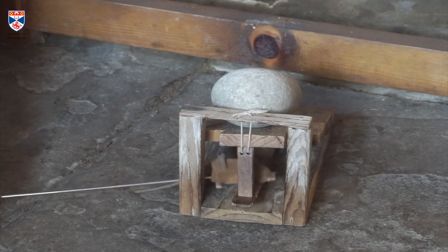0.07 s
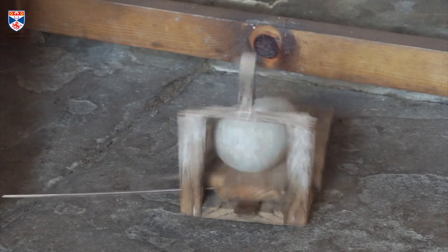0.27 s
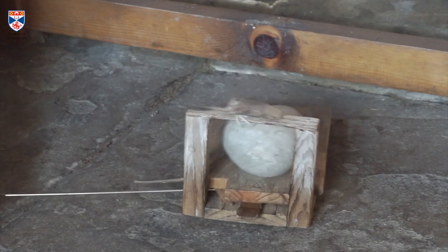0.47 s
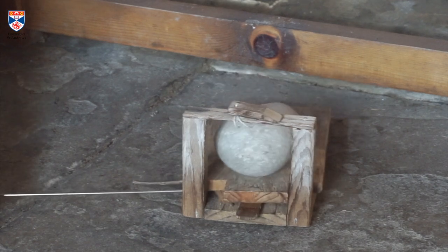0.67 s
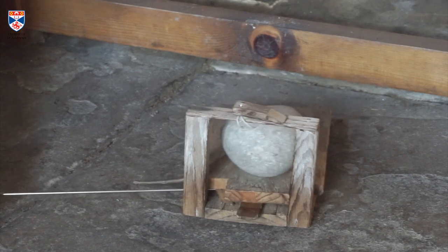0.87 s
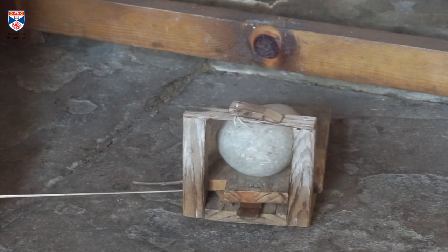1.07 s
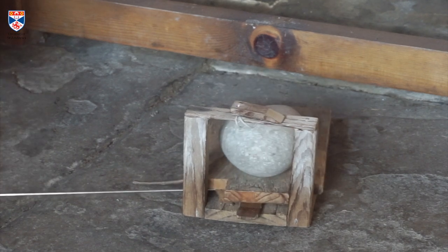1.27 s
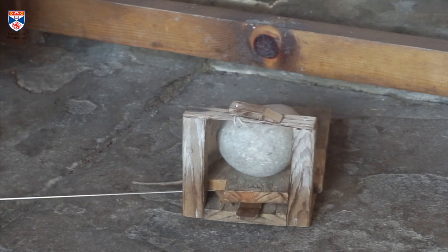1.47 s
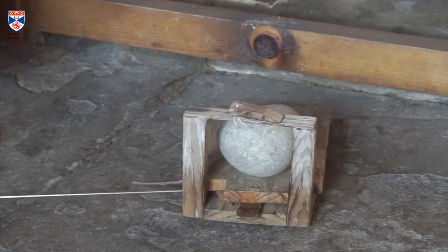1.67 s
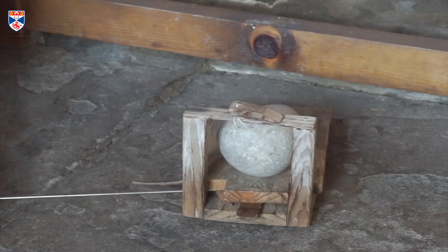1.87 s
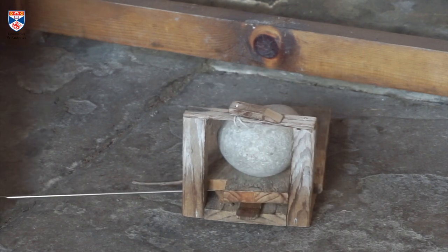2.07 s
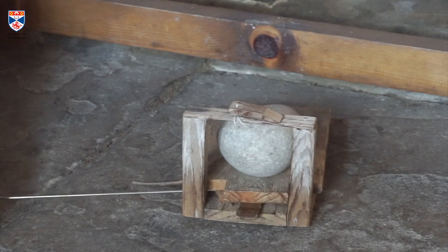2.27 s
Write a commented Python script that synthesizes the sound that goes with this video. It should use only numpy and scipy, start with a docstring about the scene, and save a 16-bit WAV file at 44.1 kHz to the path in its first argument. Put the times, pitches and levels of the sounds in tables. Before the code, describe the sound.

A small wooden trap snaps shut with one sharp knock and a brief rattle indoors.

```python
"""A stone-weighted wooden block slams onto the base of a small deadfall trap, bounces and rattles to rest.
Just before that, the trigger slips and the freed lever slaps the frame; the trigger stick drops last.
Each hit is a short crack of noise plus the ringing tones of the wood. The trap stands on a stone floor
indoors, and the room echoes. Then come faint clicks and dull, distant knocks, over hiss and a low hum."""
import sys
import numpy as np
from scipy import signal
from scipy.fft import rfft, irfft, next_fast_len
from scipy.io import wavfile
from scipy.ndimage import uniform_filter1d, minimum_filter1d

SR = 44100
rng = np.random.default_rng(int(sys.argv[2]) if len(sys.argv) > 2 else 0)


def unload_audio(sound):
    """Save the sound as a 16-bit wav file, at the path given as the first command line argument."""
    columns = np.transpose(np.atleast_2d(sound))
    # keep every value between -1 and 1, then stretch to whole-number steps
    steps = np.round(np.clip(columns, -1, 1) * 32767)
    wavfile.write(sys.argv[1], SR, steps.astype(np.int16))


N = 102135
T = np.arange(SR * 3 // 4) / SR  # the clock for one hit or echo [s]

# each landing of the block (time [s], level [dB], brightness [dB per octave], ring over crack [dB])
BLOCK_HITS = [(.3438, -4, -3.5, -1), (.3501, -9.5, -2, -2.5), (.3541, -14.5, 4, 2.5), (.3596, -19.5, 0, 5),
              (.3746, -12, 0, -9), (.3817, -13, -1, 2), (.3856, -19, -2.5, -15), (.3919, -20.5, 2, -2),
              (.4053, -19.5, -0.5, -8), (.4195, -17, -2, -0.5), (.4250, -13.5, -4, 0), (.4360, -21, 1.5, 6),
              (.4510, -19.5, -2.5, -20.5), (.4628, -22, -5, -8.5), (.491, -27.5, -3.5, 2.5),
              (.506, -37.5, -9.5, 2), (.634, -45.5, -2.5, 5)]
# the tones that block and base ring with (pitch [Hz], level [dB], time to fade by 60 dB [s])
BLOCK_TONES = [(512, -16.5, .09), (680.2, -11.5, 0.037), (808, -12, 0.054), (874, -17, 0.12),
               (918.5, -8, 0.05), (1028, -15.5, 0.09), (1187, -7, 0.089), (1256.3, -11, 0.14),
               (1296, -10.5, 0.082), (1367.5, -7.5, 0.076), (1592, -19.5, 0.068), (1835, -17, .09),
               (2500, -23, .08), (2837, -19, .07), (4930, -39, .07)]
# the crack of each landing, from bass to treble (frequency [Hz], level [dB])
BLOCK_CRACK = [(80, -31), (400, -20), (650, -4.5), (1000, 1.5), (1200, 5), (1360, 10.5), (1470, -7),
               (1700, 2), (2150, -9), (2900, -5.5), (4300, -18.5), (6500, -25.5), (8500, -39.5),
               (11000, -62)]
# the low thud that swells as the block drops (frequency [Hz], level [dB])
BLOCK_THUD = [(40, -16.5), (90, 0), (170, -0.5), (270, -6), (480, -7.5), (900, -24.5), (3000, -50)]


def falling_block():
    """A low thud swells as the weighted block drops, just before it strikes the base and rattles."""
    out = struck(BLOCK_HITS, BLOCK_TONES, BLOCK_CRACK,
                 crack_db=0, crack_fade_s=0.054, echo_db=-8, low_cut_hz=327)
    thud = puff(lambda hz: read_curve(BLOCK_THUD, hz), rise_s=0.016, fade_s=0.19)
    add(out, amp(-32) * thud, start_s=0.323)
    return out


# each slap of the lever (time [s], level [dB], brightness [dB per octave], ring over crack [dB])
LEVER_HITS = [(.2538, -12.5, 1, -2), (.2573, -16, -2.5, -1), (.273, -26, 1, -4), (.310, -30, 1, -4.5),
              (.329, -29.5, -5, -2)]
# the tones the lever rings with (pitch [Hz], level [dB], time to fade by 60 dB [s])
LEVER_TONES = [(764, -14.5, 0.12), (841.7, -8, .04), (1248, -10.5, .2), (1600, -12, 0.019), (1710, 2, .03),
               (2236, -14, .05), (2380, -10, .06), (2964, -18, 0.039), (3522, -18.5, .04)]
# the crack of lever on frame (frequency [Hz], level [dB])
LEVER_CRACK = [(120, -46), (400, -9), (850, 3.5), (1270, 10), (1480, 0.5), (1750, 5), (3200, -0.5),
               (5500, -13.5), (8000, -25), (11000, -35.5)]


def lever():
    """The freed lever whips round and clatters on the frame."""
    return struck(LEVER_HITS, LEVER_TONES, LEVER_CRACK,
                  crack_db=0.5, crack_fade_s=0.055, echo_db=-2, low_cut_hz=334)


# each tap of the stick (time [s], level [dB], brightness [dB per octave], ring over crack [dB])
STICK_HITS = [(.5525, -33, 1, -1), (.627, -47.5, 4, -9)]
# the tones the stick rings with (pitch [Hz], level [dB], time to fade by 60 dB [s])
STICK_TONES = [(2540, -3, 0.058), (2696, -7, .05), (3405, -9, .02), (4830, -18, .03)]
# the crack of each tap (frequency [Hz], level [dB])
STICK_CRACK = [(300, -14), (1400, 8.5), (3300, 8), (5500, -12.5), (10000, -18.5)]


def trigger_stick():
    """The light, loose trigger stick drops and hops once."""
    return struck(STICK_HITS, STICK_TONES, STICK_CRACK,
                  crack_db=0.5, crack_fade_s=0.037, echo_db=-4, low_cut_hz=700)


# faint clicks and scuffs of trigger, stone, cord and wood, a first faint distant knock at the very start, plus
# one loud, sharp crack as the block lands # (time [s], level [dB], centre pitch [Hz], width [octaves], rise
# time [s], time to fade by 60 dB [s])
CLICKS = [(.001, -45, 906, 0.65, 0.00088, 0.21), (0.1592, -41, 2250, 0.74, 0.00098, 0.043),
          (0.236, -33.5, 1860, 1.3, 0.0041, 0.054), (0.3496, -5, 3000, 0.31, .0003, 0.013),
          (0.411, -24, 4600, .7, 0.00058, 0.0069), (.960, -44.5, 1190, 0.83, 0.0024, 0.071),
          (1.498, -28, 6800, 0.54, 0.012, 0.066), (1.511, -50, 1696, 0.78, 0.0034, 0.16),
          (1.676, -49.5, 7630, 0.13, 0.00039, 0.039), (1.731, -49, 880, 1.42, 0.005, 0.12),
          (1.763, -46, 3500, 1.2, 0.00059, 0.027), (2.295, -53, 2500, 0.85, 0.0025, 0.15)]


def clicks():
    """Faint clicks, scuffs, a first distant knock and one loud landing crack are each a puff of noise around
    their own pitch."""
    out = np.zeros((2, N))
    for start_s, level_db, centre_hz, width, rise_s, fade_s in CLICKS:
        def hump_db(hz):
            distance = np.log2((hz + 1) / centre_hz) / width
            return -20 * np.log10(1 + distance ** 2 / 2 + (distance / 2) ** 4)
        click = puff(hump_db, rise_s, fade_s)
        add(out, amp(level_db) * room_echo(click, echo_db=-6), start_s)
    return out


# each dull knock (time [s], level [dB], brightness [dB per octave], ring over crack [dB])
KNOCK_HITS = [(1.0598, -43.5, -1, -0.5), (1.0661, -43.5, -1.5, -0.5), (1.578, -42, 0.5, -5.5),
              (1.586, -40.5, 1, -10), (2.1541, -46.5, .5, -1.5), (2.1621, -41.5, .5, -2)]
# the tones the knocks ring with (pitch [Hz], level [dB], time to fade by 60 dB [s])
KNOCK_TONES = [(494, -11.5, 0.061), (587, -2, 0.071), (626, -1, 0.075), (851, -10.5, 0.054),
               (1116, -28, 0.045), (1910, -13.5, 0.028), (2170, -11, .04)]
# the soft noise of each contact (frequency [Hz], level [dB])
KNOCK_PUFF = [(150, -15), (350, -12.5), (550, 3), (900, 2.5), (1250, -5.5), (1700, -10.5), (2500, -15),
              (4000, -22.5), (10000, -67.5)]


def distant_knocks():
    """Soft, hollow knocks come from across the room."""
    return struck(KNOCK_HITS, KNOCK_TONES, KNOCK_PUFF,
                  crack_db=-0.5, crack_fade_s=0.065, echo_db=-0.5, low_cut_hz=140)


def struck(hits, tones, crack_curve, crack_db, crack_fade_s, echo_db, low_cut_hz):
    """Each hit cracks and rings with its own loudness, brightness and amount of ring."""
    rise_s, scatter_db = 0.00044, 5
    out = np.zeros((2, N))
    for start_s, level_db, brightness, ring_db in hits:
        def tilt_db(hz):
            return brightness * np.log2(np.clip(hz, 300, 5000) / 1200)
        ring = np.zeros(len(T))
        for k, (pitch_hz, tone_db, fade_s) in enumerate(tones):
            gain = amp(tone_db + tilt_db(pitch_hz) + scatter_db * rng.standard_normal())
            wave = (-1) ** k * np.sin(2 * np.pi * pitch_hz * T)  # every other tone starts downward
            ring += gain * wave * rise_and_fade(rise_s, fade_s)
        crack = puff(lambda hz: read_curve(crack_curve, hz) + tilt_db(hz), rise_s, crack_fade_s)
        hit = amp(ring_db) * ring + amp(crack_db) * crack
        add(out, amp(level_db) * room_echo(hit, echo_db), start_s)
    # a small object gives off little bass
    return signal.sosfilt(signal.butter(2, low_cut_hz, "highpass", fs=SR, output="sos"), out)


# how alike a puff is in the left and right ear (frequency [Hz], likeness [-1 to 1])
PUFF_LIKENESS = [(1200, 0.97), (2500, 1), (5000, 0.66), (9000, .45)]


def puff(colour_db, rise_s, fade_s):
    """A puff of noise rises and dies away; colour_db gives the level at each frequency."""
    noise = stereo(rng.standard_normal((2, len(T))), PUFF_LIKENESS)
    coloured = filtered(noise, lambda hz: amp(colour_db(hz)))
    return normalise(coloured) * rise_and_fade(rise_s, fade_s)


# how long the room's echo lasts (frequency [Hz], time to fade by 60 dB [s])
ECHO_FADE = [(150, 0.97), (600, 0.37), (1300, 0.33), (3000, 0.33), (6000, 0.45), (11000, 0.17)]
# how alike the echo is in the left and right ear (frequency [Hz], likeness [-1 to 1])
ECHO_LIKENESS = [(150, .8), (500, 0.98), (1300, 0.98), (2500, 0.63), (5000, 1), (9000, .15)]
# how strongly the room returns each frequency (frequency [Hz], level [dB])
ECHO_COLOUR = [(200, 2.5), (800, -4.5), (1270, 1.5), (1500, 3), (1730, -6.5), (2100, 1), (3000, -1.5),
               (9000, -0.5)]


def room_echo(sound, echo_db):
    """The room adds a tail of echoes in which each frequency dies away at its own speed."""
    build_up_s = 0.0036
    hz, t, bands = signal.stft(rng.standard_normal((2, len(T))), SR, nperseg=256)
    fading = np.exp(-np.log(1000) * t / read_curve(ECHO_FADE, hz)[:, None])
    tail = signal.istft(bands * fading, SR)[1][:, :len(T)]
    tail = stereo(tail * (1 - np.exp(-T / build_up_s)), ECHO_LIKENESS)
    tail /= np.linalg.norm(tail[0])
    tail = filtered(tail, lambda hz: amp(read_curve(ECHO_COLOUR, hz)))
    return sound + amp(echo_db) * signal.fftconvolve(sound, tail, axes=1)[:, :len(T)]


# the hiss, from bass to treble (frequency [Hz], level [dB])
HISS_COLOUR = [(12, -29), (20, -7.5), (38, -14.5), (62, -13.5), (77, -21), (161, -23.5), (288, -25),
               (652, -23.5), (725, -26), (1690, -28), (2440, -29.5), (11000, -34), (14300, -71),
               (22000, -120)]
# how alike the hiss is in the left and right ear (frequency [Hz], likeness [-1 to 1])
HISS_LIKENESS = [(60, 0.51), (170, 0.54), (490, 0.42), (1410, 0.18), (4040, 0.14), (11600, 0.074)]
# the slow drift in the loudness of the hiss (time [s], level [dB])
HISS_LEVEL = [(0, -55.5), (.85, -58), (1.0, -57.5), (1.2, -55.5), (1.45, -56), (2.1, -56), (2.3, -53.5)]
# four low hum tones and one high whine (pitch [Hz], level [dB])
HUM_TONES = [(25, -56.5), (50, -63), (75, -73.5), (100, -71.5), (9152, -80.5)]


def background():
    """A soft hiss runs under everything, with a low hum and a faint whine."""
    t = np.arange(N) / SR
    noise = stereo(rng.standard_normal((2, N)), HISS_LIKENESS)
    hiss = normalise(filtered(noise, lambda hz: amp(read_curve(HISS_COLOUR, hz))))
    hiss_gain = amp(np.interp(t, *np.transpose(HISS_LEVEL)))
    hum = sum(np.sqrt(2) * amp(db) * np.sin(2 * np.pi * (hz * t + rng.random())) for hz, db in HUM_TONES)
    return hiss_gain * hiss + hum


def amp(db):
    """Turn decibels into a number to multiply a sound by."""
    return 10 ** (np.asarray(db) / 20)


def normalise(sound):
    """Scale a sound so that its average strength (rms) is 1."""
    return sound / np.sqrt(np.mean(sound ** 2) + 1e-20)


def read_curve(points, hz):
    """Read between the rows of a (frequency [Hz], value) table, with octaves evenly spaced."""
    frequencies, values = np.transpose(points)
    return np.interp(np.log(hz + 1), np.log(frequencies + 1), values)


def filtered(sound, gain_at):
    """Turn each frequency up or down by gain_at(hz)."""
    length = sound.shape[-1]
    padded = next_fast_len(length + 8192)
    gains = gain_at(np.fft.rfftfreq(padded, 1 / SR))
    return irfft(rfft(sound, padded) * gains, padded)[..., :length]


def stereo(noises, likeness):
    """Blend two unrelated noises so that left and right are as alike as the table says."""
    def blend(hz):
        angle = np.arccos(np.clip(read_curve(likeness, hz), -1, 1)) / 2
        return np.array([np.cos(angle), np.sin(angle)])
    middle, side = filtered(noises, blend)
    return np.array([middle + side, middle - side])


def rise_and_fade(rise_s, fade_s):
    """Loudness that rises quickly, then falls by 60 dB every fade_s seconds."""
    return (1 - np.exp(-T / rise_s)) * np.exp(-np.log(1000) * T / fade_s)


def add(out, sound, start_s):
    """Mix a sound into out at the given time."""
    part = out[:, max(round(start_s * SR), 0):][:, :sound.shape[-1]]
    part += sound[..., :part.shape[-1]]


def scene():
    """The trap springs, with the sounds of the room around it."""
    return lever() + falling_block() + trigger_stick() + clicks() + distant_knocks() + background()


def record(dry):
    """A limiter briefly turns down the loudest peaks, and a steep filter cuts the highest treble."""
    peak_limit, hold_s, top_hz = 0.88, 0.004, 11050
    hold = round(hold_s * SR)
    needed_gain = np.minimum(1, peak_limit / (np.abs(dry).max(axis=0) + 1e-9))
    smooth_gain = uniform_filter1d(minimum_filter1d(needed_gain, hold), hold)
    return filtered(dry * smooth_gain, lambda hz: 1 / np.sqrt(1 + (hz / top_hz) ** 120))


dry = scene()
out = record(dry)
unload_audio(out)
```